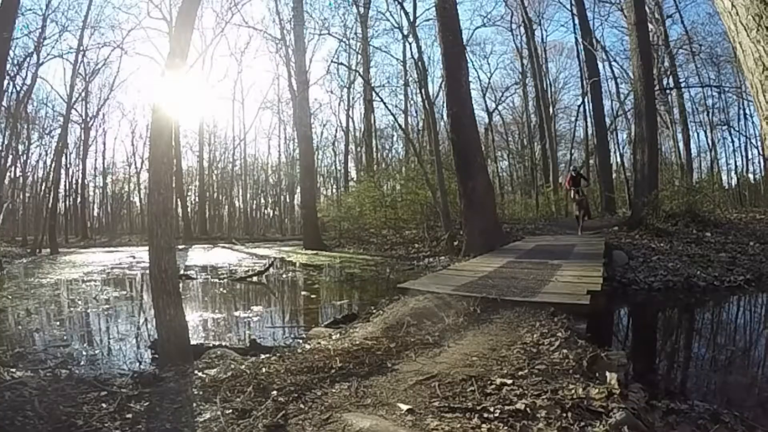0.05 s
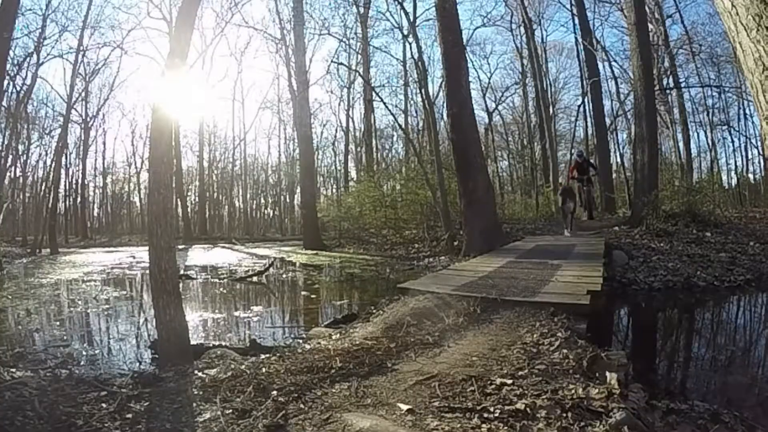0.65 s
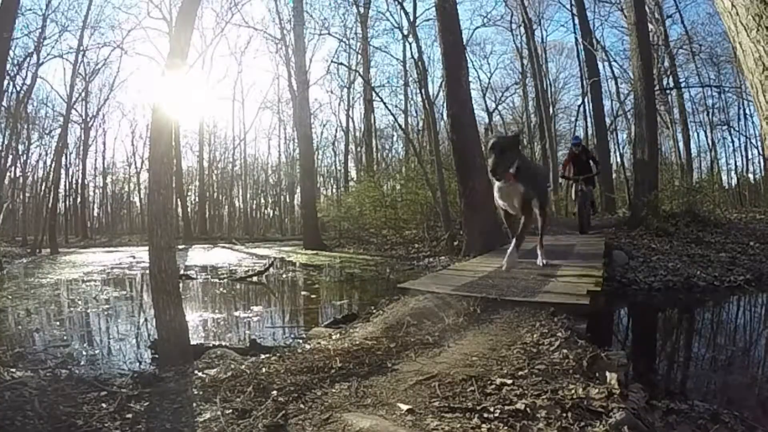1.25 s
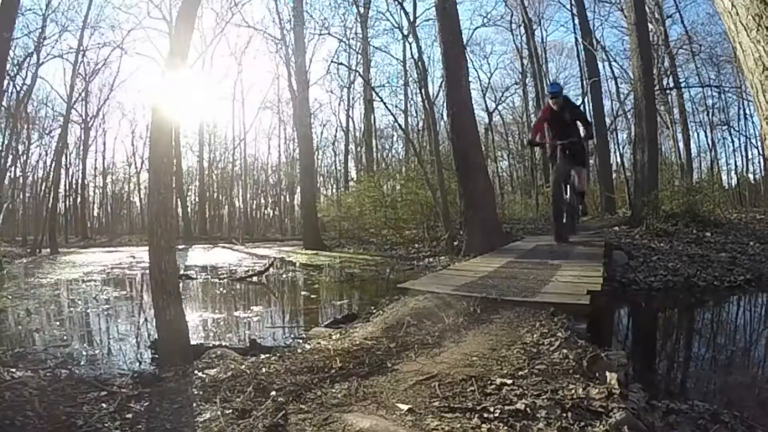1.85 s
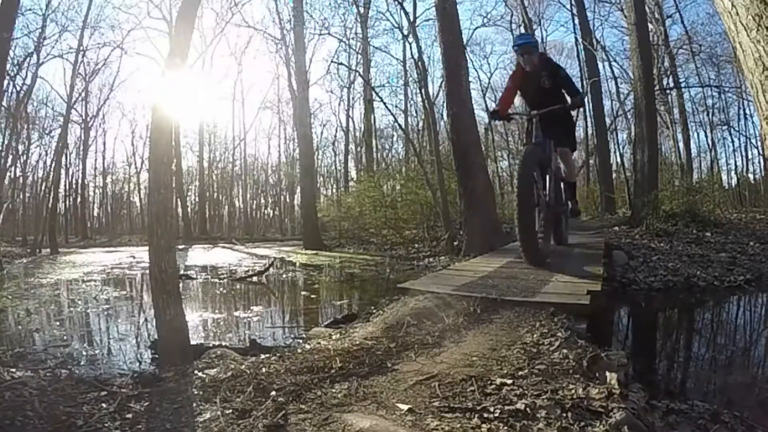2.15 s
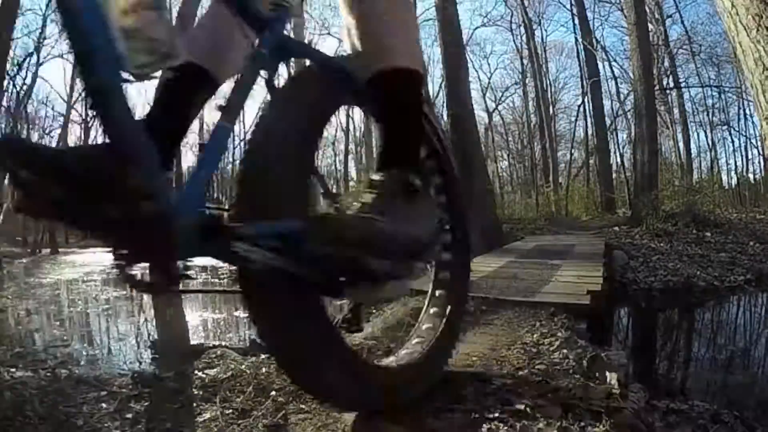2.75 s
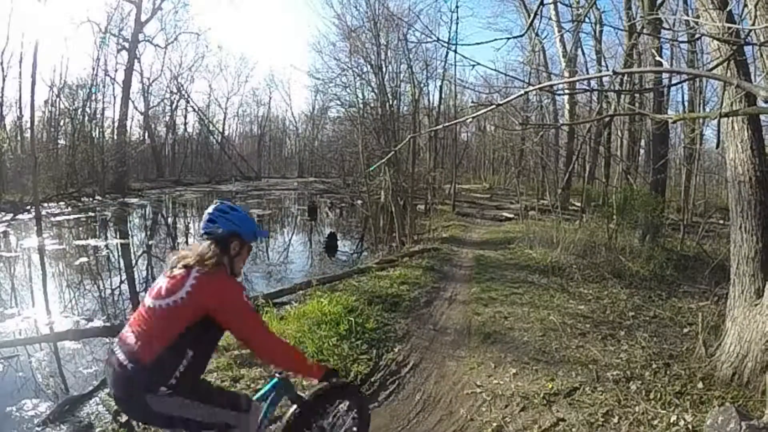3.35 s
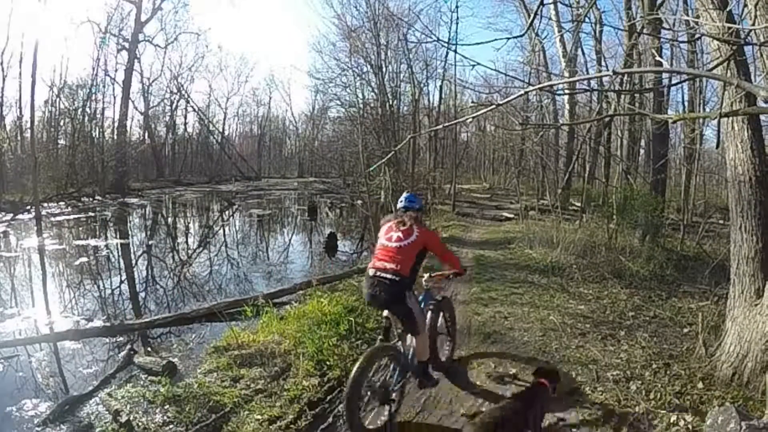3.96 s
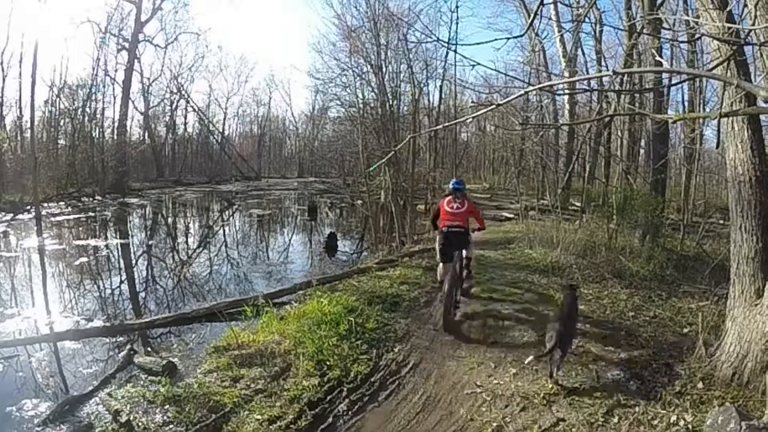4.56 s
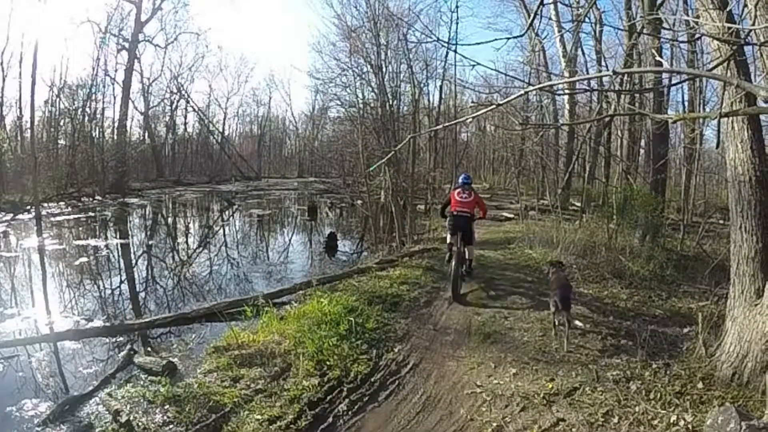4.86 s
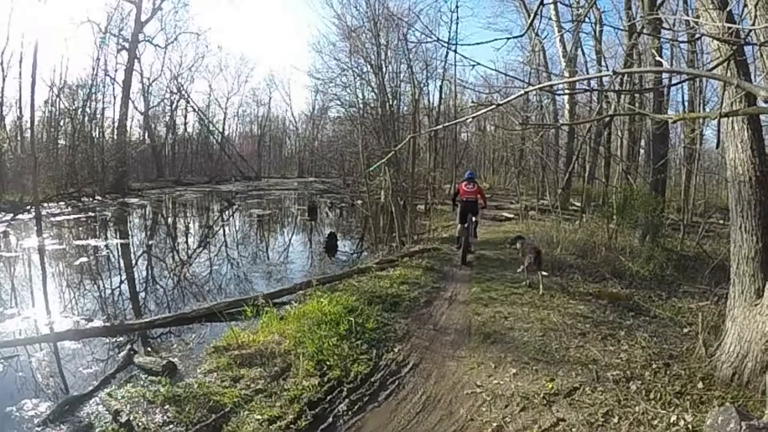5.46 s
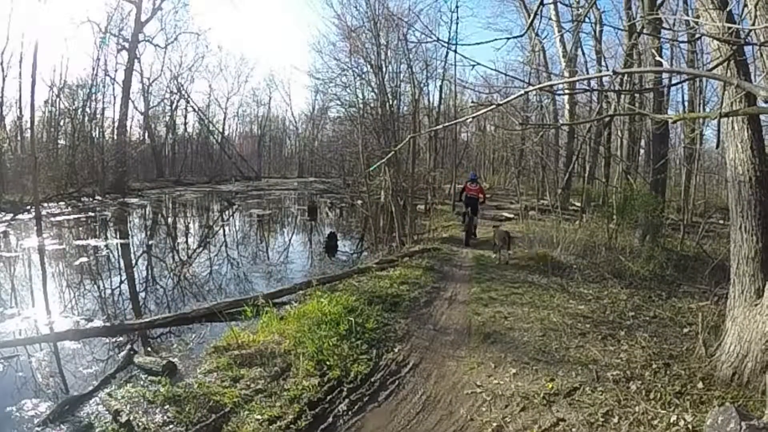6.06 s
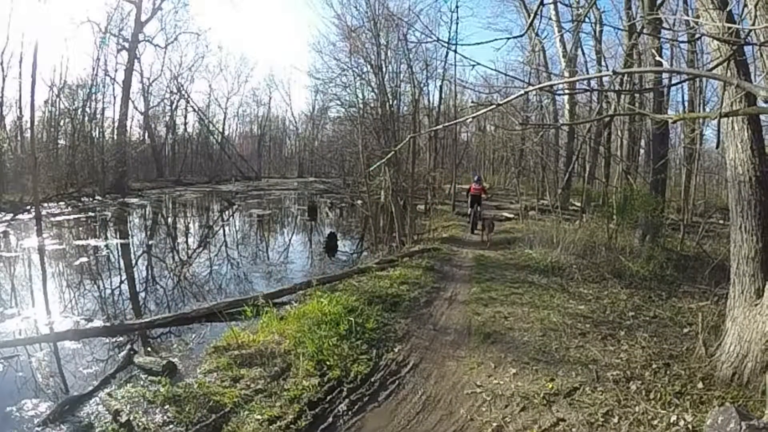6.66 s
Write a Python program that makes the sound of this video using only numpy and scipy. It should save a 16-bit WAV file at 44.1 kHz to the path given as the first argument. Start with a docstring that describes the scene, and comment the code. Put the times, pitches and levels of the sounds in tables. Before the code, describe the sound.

A dog trots over a plank bridge in a quiet wood, with soft thumps and a brief clink of its collar tag. A mountain bike follows, making the boards boom, then passes close to a microphone on the ground with crunching tyres and a buzzing freewheel. The sound cuts off with a small thud and click. Bike and dog move away faintly through dry leaves while distant birds whistle.

```python
"""Plank bridge in a wood. A dog trots over, collar tag clinking; a fat-tyred bike coasts after it,
close past a camera on the ground. Knocking planks make the deck boom, tyres crunch onto dirt,
freewheel pawls buzz. At 3 s the scene jumps, with a thud and click, to the trail beyond:
bike and dog move off through dry leaves while birds whistle in the trees."""
import sys
import numpy as np
from scipy import signal
from scipy.fft import rfft, irfft
from scipy.io import wavfile

SR = 44100
rng = np.random.default_rng(int(sys.argv[2]) if len(sys.argv) > 2 else 0)


def log_audio(samples):
    """Write samples as a 16-bit WAV file to the path given in sys.argv[1]."""
    # one column per channel
    frames = np.atleast_2d(samples).T
    # limit to full scale, then quantise
    limited = np.clip(frames, -1, 1)
    pcm = np.round(limited * 32767).astype(np.int16)
    wavfile.write(sys.argv[1], SR, pcm)


N = 295911
T = np.arange(N) / SR
HZ = np.fft.rfftfreq(N, 1 / SR)

SPEED_M_PER_S, CLOSEST_M, WHEELBASE_M = 3.62, 0.41, 0.9
DOG_ON_DECK_S, BIKE_ON_DECK_S, ON_DIRT_S, REAR_PASS_S, JUMP_S = .56, 1.7, 2.475, 2.895, 3.004

# low deck modes: f/Hz, width/Hz, gain/dB
DECK_RESONANCES = [(45.5, 8.6, 2.5), (55.4, 10, 2), (77.65, 10.9, -3)]
# hollow plank clatter: f/Hz, relative density/dB
PLANK_SPECTRUM = [(110, -32), (190, -2.5), (260, -3.5), (400, -5), (620, -6.5), (800, -20.5), (1500, -31),
                  (8000, -38)]
# heavy loads landing on planks: t/s, level/dB, f/Hz, t60/s
DECK_THUMPS = [(.579, -38, 60.4, .35), (.695, -39, 69, 0.23), (0.909, -42.5, 55, 0.48),
               (1.009, -32, 63, 0.32), (1.121, -36.5, 56.4, 0.21), (1.307, -33.5, 55.6, 0.24),
               (1.43, -25, 53.5, 0.54), (1.516, -50, 191.5, 0.34), (1.703, -19, 59.7, .26),
               (1.845, -15.5, 57.7, 0.24), (2.18, -24, 63.8, 0.24), (2.319, -27, 54, 0.1),
               (2.507, -15.5, 50.8, 0.29), (2.946, -17, 54, 0.75)]
# tread on grit: f/Hz, relative density/dB
TREAD_SPECTRUM = [(90, -5.5), (160, -1.5), (260, -10), (600, -16), (780, -16), (1080, -15), (1350, -14),
                  (2300, -22), (3300, -21.5), (4400, -26), (6200, -38), (12000, -58), (15500, -57)]
# hub ring after a pawl drop: f/Hz, relative density/dB
HUB_SPECTRUM = [(900, -20), (2200, 4), (3200, 1), (4300, 6.5), (5600, -5), (7900, -4), (9500, -6.5),
                (12200, -1), (14500, -16), (16000, -25)]
# deep throb, bridge then trail: peak t/s, level/dB, f/Hz, rise/(dB/s), fall/(dB/s)
BIKE_THROBS = [(2.6, -30.5, 22, 10.5, 9), (4.2, -43.5, 28.1, 13, 6.5)]
# tyres over bumps, plus a low thud (2.997 s) and click (3.001 s) where the sound breaks off
# at the scene jump: t/s, level/dB, f/Hz, width/oct, t60/s
BUMPS_AND_JUMP = [(2.475, -42.5, 1500, .85, 0.13), (2.585, -42.5, 1490, 0.74, 0.032),
                  (2.707, -36, 1770, 0.59, 0.091), (2.812, -40.5, 1710, .4, 0.054),
                  (2.925, -36.5, 1200, 0.94, 0.02), (2.997, -34, 150, 0.81, 0.03),
                  (3.001, -35, 900, 1.4, 0.012), (3.69, -50, 1450, 1.3, 0.12),
                  (3.896, -56, 1460, 0.42, 0.091), (4.11, -40.5, 1410, 0.24, 0.025)]
# paws on leaves and boards: t/s, level/dB
PAW_SCUFFS = [(.54, -60), (.688, -60), (.705, -58), (1.004, -50.5), (1.146, -54), (1.243, -56),
              (1.345, -61), (3.678, -49), (3.771, -55), (3.945, -59), (4.177, -49.5)]
# claws and twigs: t/s, level/dB, f/Hz, width/oct
CLAW_TWIG_CLICKS = [(1.503, -45.5, 4000, 0.72), (1.584, -38, 3860, 0.35), (1.642, -46.5, 4020, .48),
                    (1.694, -48.5, 3700, .7), (1.732, -56.5, 6000, 0.95), (1.801, -53.5, 6900, .7),
                    (3.535, -57, 7950, .8), (3.77, -54.5, 7000, 0.93), (3.827, -57, 12000, .25),
                    (3.957, -48.5, 2590, 1), (4.112, -37, 3260, 0.4)]
# dry leaf crackle: f/Hz, relative density/dB
LEAF_SPECTRUM = [(700, -27), (1150, -13.5), (1900, 0.5), (2900, 1), (4400, -0.5), (5200, 0.5),
                 (6000, -14.5), (6800, -9.5), (11000, -22), (15500, -22)]
# leaves stirred: peak t/s, level/dB, half length/s
LEAF_RUSTLES = [(1.462, -64, 0.19), (1.826, -65.5, 0.069), (3.744, -65.5, 0.27), (3.915, -65.5, 0.046),
                (4.138, -54, 0.12)]
# collar tag strikes: t/s, level/dB
TAG_STRIKES = [(1.502, -51), (1.505, -45.5), (1.526, -59), (1.588, -54)]
# collar tag modes: f/Hz, gain/dB, t60/s
TAG_MODES = [(4650, -9, .03), (7520, 0, .045), (7800, -4, .03), (15250, -17, .05)]
# bird whistles: t/s, length/s, start f/Hz, middle f/Hz, end f/Hz, level before path gain/dB
BIRD_WHISTLES = [(4.23, .085, 3050, 2750, 2330, -63.5), (4.33, .07, 2800, 2520, 2400, -67),
                 (4.81, .075, 3650, 2750, 2660, -63.5), (4.94, .08, 2130, 2300, 2380, -66),
                 (5.345, .085, 3080, 2600, 2320, -64), (5.43, .08, 2800, 2620, 2530, -68),
                 (5.922, .064, 3200, 3130, 2180, -56.5), (5.93, .045, 1650, 1620, 1420, -69),
                 (6.29, .035, 3100, 2750, 2500, -64.5), (6.55, .16, 2480, 2530, 2520, -70)]
# ground rumble: f/Hz, relative density/dB
GROUND_SPECTRUM = [(10, -11.5), (25, -5), (40, -1), (60, -2.5), (90, -9.5), (130, -23.5), (250, -63)]
# still woodland air: f/Hz, relative density/dB
AIR_SPECTRUM = [(65, -44), (110, -4), (141, 1), (196, -7), (232, -6.5), (336, -9.5), (520, -10.5),
                (680, -12), (928, -13.5), (1380, -15.5), (2460, -15), (2670, -15), (14600, -26),
                (15500, -36.5)]
# camera housing resonances: f/Hz, width/Hz, gain/dB
HOUSING_RESONANCES = [(1530, 73, 1), (2320, 65, 3), (3070, 56, 1.5), (3806, 125, 3), (4500, 150, 2),
                      (6100, 110, -2), (11900, 580, -0.5)]


def bridge(cutoff_hz=100, dog_boom_db=-9.5, dog_clatter_db=-7.5, thump_rise_s=0.03):
    """Loose planks knock the deck into its low modes; heavy loads make it boom."""
    knocks = grains(per_s=300, spread_db=-0.5)
    modes = sum(amp(db) / (1 + 1j * (HZ - hz) / width_hz) ** 3 for hz, width_hz, db in DECK_RESONANCES)
    deck = unit(irfft(rfft(knocks) * modes / (1 + (HZ / cutoff_hz) ** 20), N))
    # rolling wheels keep the swing even
    swing = np.sqrt(signal.oaconvolve(deck ** 2, np.hanning(6000) / 3000, "same") + 1e-3)
    boom = deck / swing * amp(-35.5) * wheels(db_per_decade=7)
    clatter = colour(knocks, PLANK_SPECTRUM) * amp(-60) * wheels(db_per_decade=10)
    dog_only = 1 - ramp(BIKE_ON_DECK_S, rise_s=0.025)
    out = boom * amp(dog_boom_db * dog_only) + clatter * amp(dog_clatter_db * dog_only)
    out *= ramp(DOG_ON_DECK_S, rise_s=0.4)
    t = T[:SR // 2]
    push = np.sin(np.pi / 2 * np.minimum(t / thump_rise_s, 1)) ** 2
    for s, db, hz, t60_s in DECK_THUMPS:
        add(out, s, amp(db - 60 * t / t60_s) * push * np.sin(2 * np.pi * hz * t))
    return out


def tread(rasp_hz=2350, rasp_width_hz=320, rasp_cap_db=-63, planks_db=-4, hop_s=.06, hop_db=-11):
    """Knobs grind grit in uneven spurts; a narrow rasp carries best from afar."""
    grit = grains(per_s=4000, spread_db=2.5) * amp(1.7 * drift(per_s=60))
    rasp = unit(irfft(rfft(grit) / (1 + ((HZ - rasp_hz) / rasp_width_hz) ** 2), N))
    airborne = ramp(ON_DIRT_S - hop_s, hop_s)  # front tyre between deck and dirt
    surface_db = (planks_db + hop_db * airborne) * (1 - ramp(ON_DIRT_S, rise_s=0.007))
    out_of_trees = ramp(0.51, rise_s=0.99)
    gain = amp(-49.5 + surface_db) * wheels(db_per_decade=18.5) * out_of_trees
    rasp_gain = np.minimum(gain * amp(-3.5), amp(rasp_cap_db))
    return colour(grit, TREAD_SPECTRUM) * gain + rasp * rasp_gain


def freewheel(pawl_hz=60, wobble_hz=14, fastest_s=2.863, drop_s=2.834, db_per_decade=30.5):
    """Pawls drop off each ratchet tooth and rattle the rear hub; wheel speed wobbles."""
    rise_s, ring_s, floor = 0.0016, 0.0038, 0.078
    wobble = .22 * np.cos(2 * np.pi * wobble_hz * (T - fastest_s))
    rate_hz = pawl_hz * (1 + wobble + 0.027 * drift(per_s=30))
    teeth = np.cumsum(rate_hz) / SR
    teeth -= np.interp(drop_s, T, teeth)  # one drop lands on drop_s
    age_s = (teeth % 1) / rate_hz
    snap = (1 - np.exp(-(age_s / rise_s) ** 2)) * (np.exp(-age_s / ring_s) + floor)
    # no two drops alike: each band swells on its own
    noise, ring = rfft(rng.standard_normal(N)), np.zeros(N)
    for hz in np.linspace(1000, 16000, 16):
        band = np.maximum(1 - abs(HZ - hz) / 1000, 0)
        ring += irfft(noise * band, N) * amp(3.5 * drift(per_s=80))
    return colour(snap * ring, HUB_SPECTRUM) * amp(-45.5 - db_per_decade * decades(REAR_PASS_S))


def throb(peak_s, db, hz, rise_db_per_s, fall_db_per_s):
    """A very low, wavering note swells and fades with the passing bike."""
    pitch_hz = hz * (1 + 0.0597 * drift(per_s=6.6))
    fade_db = np.maximum(rise_db_per_s * (peak_s - T), fall_db_per_s * (T - peak_s))
    tone = np.sqrt(2) * np.sin(2 * np.pi * np.cumsum(pitch_hz) / SR)
    return tone * amp(db - fade_db + 1.94 * drift(per_s=4.3))


def crunch(db, hz, width_oct, t60_s, rise_s=0.00054):
    """Fast-dying burst of crackle in a band around hz."""
    t = T[:SR // 4]
    octave = np.log2(np.fft.rfftfreq(len(t), 1 / SR) + 1)
    cracks = rng.standard_normal(len(t)) * (rng.random(len(t)) < .25)
    band = (1 + ((octave - np.log2(hz)) / width_oct) ** 2 / 2) ** -2
    burst = unit(irfft(rfft(cracks) * band, len(t)))
    return burst * amp(db - 60 * t / t60_s) * (1 - np.exp(-t / rise_s))


def crunches():
    """Paws scuff, claws and twigs click, tyres crunch; a low thud and click mark the scene jump."""
    out = np.zeros(N)
    for s, db in PAW_SCUFFS:
        add(out, s, crunch(db, hz=2850, width_oct=0.72, t60_s=0.097))
    for s, db, hz, width_oct in CLAW_TWIG_CLICKS:
        add(out, s, crunch(db, hz, width_oct, t60_s=0.025))
    for s, db, hz, width_oct, t60_s in BUMPS_AND_JUMP:
        add(out, s, crunch(db, hz, width_oct, t60_s))
    return out


def leaves():
    """Stirred dry leaves crackle in loose clumps."""
    crackle = grains(per_s=7000, spread_db=2.6) * amp(1.9 * drift(per_s=70))
    stirring = sum(amp(db) * np.exp(-((T - s) / half_s) ** 2) for s, db, half_s in LEAF_RUSTLES)
    return colour(crackle, LEAF_SPECTRUM) * stirring


def collar_tag():
    """A small metal tag rings in its modes as the dog goes by."""
    out, t = np.zeros(N), T[:SR // 4]
    for s, strike_db in TAG_STRIKES:
        for hz, mode_db, t60_s in TAG_MODES:
            decay = amp(strike_db + mode_db - 60 * t / t60_s)
            add(out, s, decay * np.sin(2 * np.pi * (hz * t + rng.random())))
    return out


def soil(peak_s=3.85, half_s=.8):
    """Soft trail rumbles faintly under the departing tyres."""
    rumble = colour(rng.standard_normal(N), GROUND_SPECTRUM)
    return rumble * amp(-65.5) * np.exp(-((T - peak_s) / half_s) ** 2)


def birds():
    """Far whistles, mostly falling, blurred by near twigs and echoed by the deep wood."""
    direct = np.zeros(N)
    waver = 1 + 0.014 * drift(per_s=270)
    for s, length_s, start_hz, middle_hz, end_hz, db in BIRD_WHISTLES:
        progress = np.linspace(0, 1, int(length_s * SR))
        glide = np.polyfit([0, .5, 1], [start_hz, middle_hz, end_hz], 2)
        hz = np.polyval(glide, progress) * np.interp(s + progress * length_s, T, waver)
        envelope = amp(db) * signal.windows.tukey(len(progress), .3)
        add(direct, s, envelope * np.sin(2 * np.pi * np.cumsum(hz) / SR))
    twigs = tree_echoes(direct, t60_s=0.094)
    deep_wood = tree_echoes(direct, t60_s=0.56)
    return amp(-4.5) * direct + amp(-5) * twigs + amp(-2) * deep_wood


def tree_echoes(x, t60_s, delay_s=.012):
    """Sparse echoes scattered by trees."""
    t = T[:SR]
    echoes = rng.standard_normal(SR) * (rng.random(SR) < .05) * amp(-60 * t / t60_s) * (t > delay_s)
    return signal.fftconvolve(x, echoes / np.linalg.norm(echoes))[:N]


def air():
    """Even woodland hush over a faint ground rumble."""
    hush = amp(-63.5) * colour(rng.standard_normal(N), AIR_SPECTRUM)
    return hush + amp(-61) * colour(rng.standard_normal(N), GROUND_SPECTRUM)


def wheels(db_per_decade):
    """Distance gain of both wheels, summed in power."""
    front_pass_s = REAR_PASS_S - WHEELBASE_M / SPEED_M_PER_S
    front, rear = (amp(-db_per_decade * decades(s)) for s in (front_pass_s, REAR_PASS_S))
    return np.hypot(front, rear)


def decades(pass_s):
    """log10 of distance over closest distance, for a wheel on a straight path."""
    return np.log10(np.hypot(CLOSEST_M, SPEED_M_PER_S * (T - pass_s)) / CLOSEST_M)


def grains(per_s, spread_db):
    """Random impulses of uneven size, unit rms."""
    size = amp(spread_db * np.minimum(rng.exponential(1, N), 4))
    return unit(size * rng.standard_normal(N) * (rng.random(N) < per_s / SR))


def drift(per_s):
    """Random wander, unit rms."""
    knots_s = np.arange(0, T[-1] + 1, .5 / per_s)
    return unit(np.interp(T, knots_s, rng.standard_normal(len(knots_s))))


def colour(x, spectrum):
    """Filter by (f/Hz, gain/dB) rows, unit rms."""
    hz, db = np.transpose(spectrum)
    gain = amp(np.interp(np.log(HZ + 1), np.log(hz), db))
    return unit(irfft(rfft(x) * gain, N))


def ramp(start_s, rise_s):
    """Linear rise, 0 to 1."""
    return np.clip((T - start_s) / rise_s, 0, 1)


def add(mix, start_s, sound):
    """Mix in at start_s."""
    part = mix[max(round(start_s * SR), 0):][:len(sound)]
    part += sound[:len(part)]


def amp(db):
    """dB to gain."""
    return 10 ** (np.asarray(db) / 20)


def unit(x):
    """Scale to unit rms."""
    return x / np.sqrt(np.mean(x ** 2) + 1e-20)


def scene():
    """Bridge and close bike break off at the jump; the wood carries on."""
    before_jump = np.clip((JUMP_S - T) / .0015, 0, 1)
    bridge_throb, trail_throb = (throb(*row) for row in BIKE_THROBS)
    transients = crunches() + leaves() + collar_tag()
    at_bridge = tread() + freewheel() + bridge() + bridge_throb * ramp(0, rise_s=0.72)
    at_bridge += amp(-16.5) * tree_echoes(transients, t60_s=0.24)
    on_trail = trail_throb + soil()
    on_trail += amp(-17.5) * tree_echoes(transients * ramp(JUMP_S + .1, rise_s=.1), t60_s=0.78)
    return (at_bridge * before_jump + on_trail * (1 - before_jump) + transients + birds() + air())[None]


def record(dry, cutoff_hz=15600):
    """Housing resonances, then low-pass."""
    housing_db = sum(db * np.exp(-((HZ - hz) / width_hz) ** 2) for hz, width_hz, db in HOUSING_RESONANCES)
    boxed = irfft(rfft(dry) * amp(housing_db - 1.5), N)
    lowpass = signal.firwin(401, cutoff_hz, window=("kaiser", 8), fs=SR)
    return signal.oaconvolve(boxed, lowpass[None], "same")


dry = scene()
out = record(dry)
log_audio(out)
```